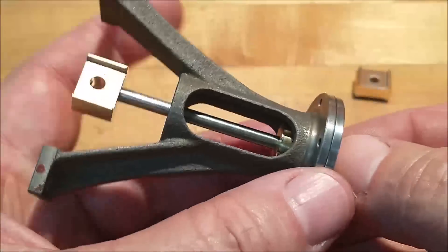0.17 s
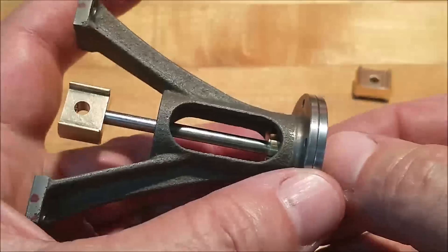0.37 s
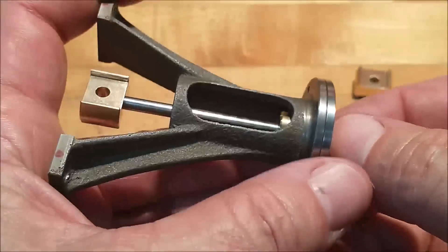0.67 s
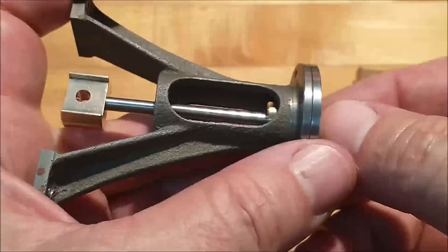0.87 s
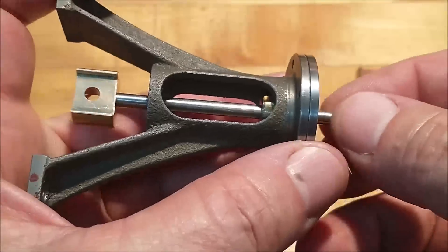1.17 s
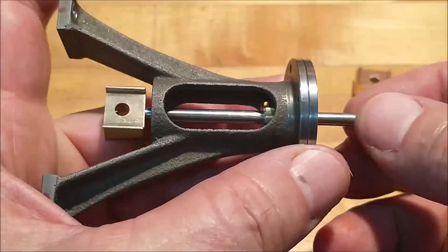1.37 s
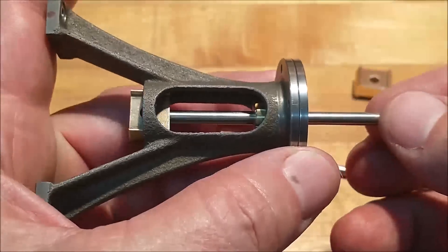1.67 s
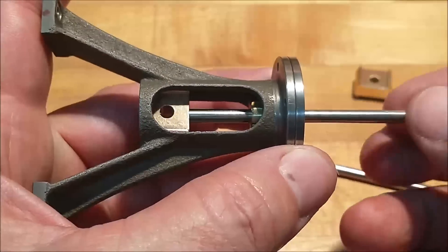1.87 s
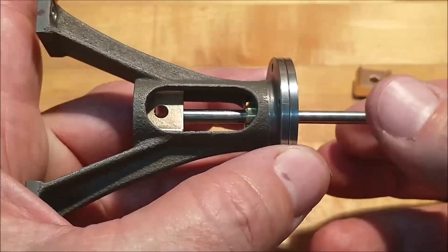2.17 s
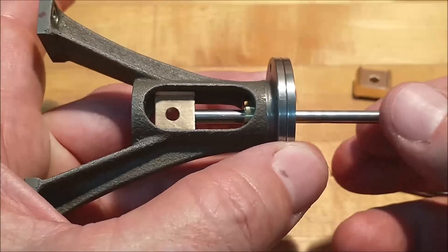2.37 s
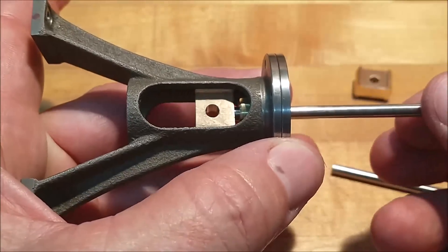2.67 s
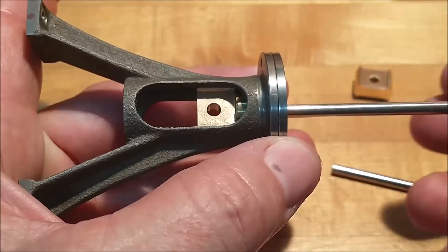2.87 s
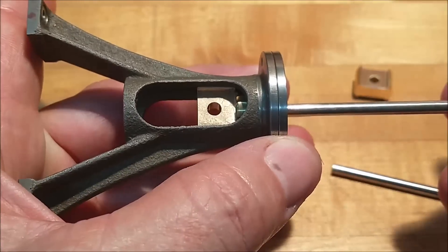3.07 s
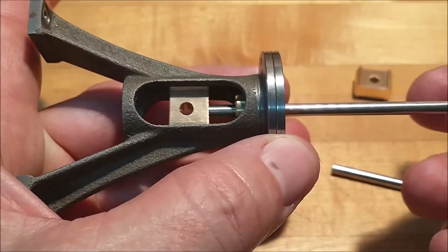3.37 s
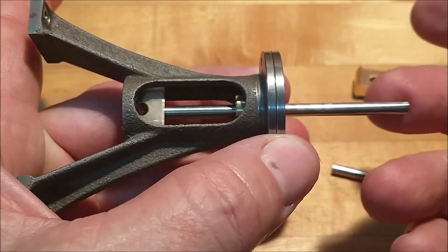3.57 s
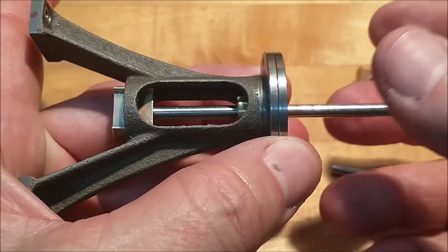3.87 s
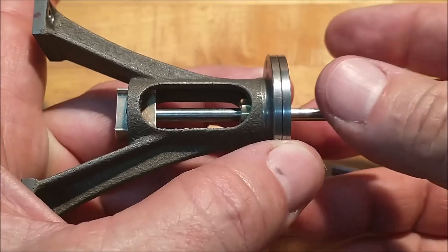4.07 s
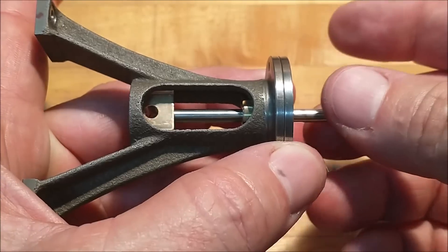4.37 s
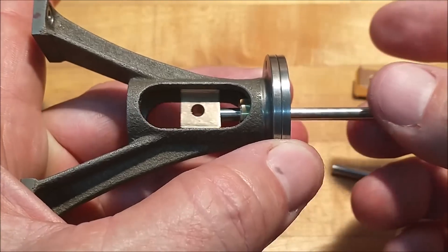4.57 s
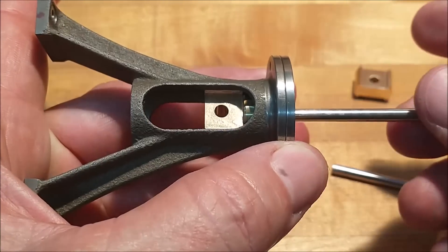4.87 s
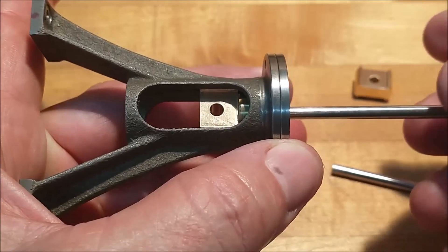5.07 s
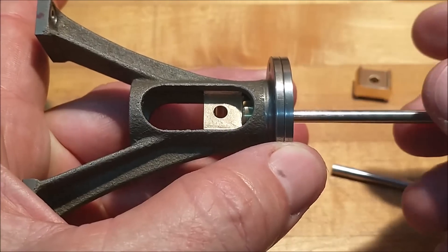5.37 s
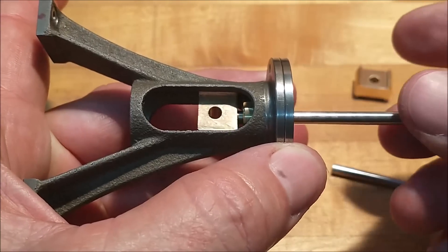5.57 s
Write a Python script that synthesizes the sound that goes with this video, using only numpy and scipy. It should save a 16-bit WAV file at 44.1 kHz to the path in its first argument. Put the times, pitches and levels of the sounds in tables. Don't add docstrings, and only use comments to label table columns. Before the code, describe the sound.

Steady machine noise fills an indoor workshop from beginning to end: a dominant low hum, quick even pulsing that blurs into a buzzing drone, light valve clacking, ringing metal rattle and quiet breathy hiss. Nothing starts or stops. The two microphones hear a wide, slightly uneven stereo picture, with solid lows and diffuse highs. The small metal rod and block being slid by hand make no distinct sound.

```python
import sys
import numpy as np
from scipy import signal
from scipy.fft import rfft, irfft, next_fast_len
from scipy.io import wavfile
from scipy.ndimage import uniform_filter1d, map_coordinates

SR = 44100
rng = np.random.default_rng(int(sys.argv[2]) if len(sys.argv) > 2 else 0)


def put_to_file(sound):
    columns = np.atleast_2d(sound).T
    safe = np.clip(columns, -1, 1)
    whole_steps = np.round(safe * 32767)
    wavfile.write(sys.argv[1], SR, whole_steps.astype(np.int16))


def linear_from_db(decibels):
    return 10 ** (np.asarray(decibels, float) / 20)


N = 251943

CRANK_HZ = 16.257
HUM_HZ = 120.01
LAG_S = 14 / SR

# multiple of the crank rate, level in dB rms, left-right difference in dB.
STRONG_HARMONICS = [(4, -53, -3), (5, -59, -2), (6, -54, -1), (7, -61, 0), (8, -45, -2), (9, -54, -1),
                    (10, -52, -3), (11, -56, 2), (12, -56, 1), (14, -55, -10), (16, -55, 0), (17, -62, -1),
                    (18, -49, -2), (19, -59, 0), (20, -54, -2), (21, -62, 2), (22, -55, -4), (23, -64, 0),
                    (25, -55, -6), (30, -62, -4), (34, -64, 3), (35, -63, 2), (32, -66, -10), (36, -61, -1),
                    (37, -59, -14), (38, -66, 2), (39, -66, 1), (42, -66, 0), (44, -64, 1), (46, -63, 0)]
# frequency in Hz, level in dB rms.
FAINT_HARMONICS = [(220, -69.5), (410, -65), (470, -75.5), (560, -72), (700, -76.5), (830, -67.5),
                   (1070, -81), (1230, -72.5)]
# frequency in Hz, arrival in turns.
BAND_ARRIVAL = [(90, 0.852), (115, .47), (146, .45), (180, 0.719), (235, 0.496), (280, 1.2), (310, .93),
                (480, 1.55)]
# frequency in Hz, left lead in radians.
STANDING_WAVE_LEAD = [(520, 0), (660, -1.0), (720, -2.34), (750, -3), (775, -0.4), (900, -0.7), (950, 0)]
# multiple of the hum, multiple of the crank rate, level in dB rms,
# left-right difference in dB, left lead in radians.
HUM_SIDEBANDS = [(1, 0, -39, 0, -0.2), (1, -3, -67, 0, 0.0), (1, -2, -58, -1, -0.3), (1, 1, -66, 0, -0.0),
                 (1, 3, -65, -3, -0.1), (1, 4, -67, 0, 0.3), (1, 5, -70, -2, 0.5), (1, 8, -75, -2, 0.2),
                 (-1, 14, -61, 0, -0.2), (2, -7, -66, 1, 0.0), (2, -4, -71, -1, 0.3), (3, 0, -66, -6, -0.1),
                 (4, 0, -81, -3, 0.3)]
# frequency in Hz, level in dB rms.
CLACK_LEVELS = [(1400, -85.5), (1650, -77), (2000, -84.5), (2200, -71.5), (2600, -74), (2900, -75),
                (3300, -84), (3800, -87), (4200, -99)]
# frequency in Hz, density in dB per Hz.
RUMBLE_SPECTRUM = [(42, 5), (65, 14), (122, 21), (150, 16), (230, 11), (400, 11), (460, 7), (700, 3),
                   (830, 9), (960, 3), (1400, 3), (1700, 6), (2100, 5), (2600, -30)]
# frequency in Hz, density in dB per Hz.
CASING_SPECTRUM = [(1700, -32), (2050, -8), (2350, 10), (2750, 14.5), (3150, 8.5), (3650, 12.5), (4000, 10),
                   (4500, 6.5), (4900, 2), (5600, -28)]
# frequency in Hz, density in dB per Hz.
HISS_SPECTRUM = [(4000, -13), (5000, 4.5), (6000, 10.5), (8000, 14.5), (9200, 10), (10500, 5), (11600, 2.5),
                 (12000, 5), (14000, 4.5), (15000, -5), (15200, -7), (15700, 0), (15900, -50)]
# frequency in Hz, width in Hz, level in dB.
TANK_MODES = [(410, 7, 27), (745, 12, 12), (810, 6, 14), (829, 8, 18), (861, 7, 14), (911, 6, 13),
              (1000, 16, 10), (1253, 14, 10), (1322, 16, 8), (1403, 8, 10), (1462, 7, 10), (1623, 12, 11),
              (1670, 20, 11), (1837, 7, 23), (1859, 5, 21), (1964, 8, 12)]
# frequency in Hz, width in Hz, level in dB.
SHELL_MODES = [(2104, 6, 13), (2195, 7, 13), (2227, 9, 15), (2309, 8, 19), (2343, 8, 16), (2465, 14, 18),
               (2735, 25, 21), (2932, 14, 18), (3083, 9, 17), (3179, 9, 20), (3287, 12, 20), (3400, 14, 18),
               (3505, 10, 25), (3630, 10, 19), (3670, 14, 26), (3753, 10, 22), (3987, 8, 15),
               (4044, 14, 15), (4125, 10, 14), (4284, 10, 14), (4400, 8, 14)]
# frequency in Hz, width in Hz, level in dB.
PORT_WHISTLES = [(5084, 26, 15.5), (5980, 40, 16), (6370, 61, 18.5), (9030, 114, 15.5)]
# time in seconds, level in dB.
RATTLE_LEVELS = [
    (0.0, -47),
    (0.75, -46),
    (2.22, -49.5),
    (2.34, -47.5),
    (2.85, -48),
    (3.96, -47),
    (4.02, -49),
    (5.37, -48.5),
    (5.71, -48),
]
# frequency in Hz, left-right coherence from 0 to 1.
LIKENESS = [(60, 0.91), (250, 1), (500, 0.75), (1000, 0.21), (2500, 0.29), (5000, 0.22), (15000, 0.15)]
# frequency in Hz, left-right difference in dB.
SIDE_BALANCE = [(60, 4), (110, 3), (200, -3), (380, -2), (700, -3), (1290, -1), (2380, -3), (4400, -0.5),
                (8120, -7), (15000, -6)]


def unit(x):
    return x / np.sqrt(np.mean(x ** 2) + 1e-20)


def along(points, hz):
    point_hz, value = np.transpose(points)
    return np.interp(np.log(hz + 1), np.log(point_hz + 1), value)


def wobble(rate, count=N, per=SR):
    knots = rng.standard_normal(int(count * rate / per) + 4)
    return map_coordinates(knots, [np.arange(count) * rate / per])


def throb(depths, start):
    angle = 2 * np.pi * (CRANK_HZ * np.arange(N) / SR - start)
    return 1 + sum(d * np.cos(2 ** (k + 1) * angle) for k, d in enumerate(depths))


def resonant_noise(spectrum, modes, ripple_db, ripple_hz, patchy_db):
    z = signal.stft(rng.standard_normal((2, N)), nperseg=1024)[2]
    field = uniform_filter1d(rng.standard_normal(z.shape[1:]), size=6, axis=0)
    field = uniform_filter1d(field, size=24, axis=1)
    pair = signal.istft(z * linear_from_db(patchy_db * unit(field)), nperseg=1024)[1][:, :N]

    m = next_fast_len(N + SR // 2)
    f = np.fft.rfftfreq(m, 1 / SR)
    ripple = ripple_db * np.array([wobble(1 / ripple_hz, count=len(f), per=m / SR) for _ in range(2)])
    peaks = sum(linear_from_db(db) ** 2 / (1 + (2 * (f - hz) / width) ** 2) ** 2 for hz, width, db in modes)
    gain = np.sqrt(linear_from_db(along(spectrum, f) + ripple) ** 2 + peaks)

    turn = np.arccos(np.clip(along(LIKENESS, f), 0, 1)) / 2
    mid, side = rfft(pair, m) * [np.cos(turn), np.sin(turn)]
    pan_db = along(SIDE_BALANCE, f) / 2
    lag = np.exp(-1j * np.pi * f * LAG_S)
    both = [(mid + side) * lag, (mid - side) / lag]
    return irfft(gain * linear_from_db([pan_db, -pan_db]) * both, m)[:, :N]


def at_points(hz, db, pan_db, lead, phase):
    turn = np.pi * hz * LAG_S - lead / 2
    share = 2 / np.sqrt(1 + linear_from_db(-2 * np.array([pan_db, -pan_db])))
    return linear_from_db(db) * share * np.exp(1j * (phase + [-turn, turn]))


def every_turn(order, sizes):
    size = 2 ** 15
    bins = np.zeros((2, size // 2 + 1), complex)
    bins[:, order.astype(int)] = sizes * size / 2
    place = CRANK_HZ * np.arange(N) / SR % 1 * size
    return np.array([np.interp(place, np.arange(size), v, period=size) for v in irfft(bins, size)])


def tank():
    rumble = resonant_noise(RUMBLE_SPECTRUM, TANK_MODES, ripple_db=3.0, ripple_hz=12, patchy_db=1.5)
    return linear_from_db(-49.8) * throb([.08, .08], start=0.25) * rumble


def air():
    swell = linear_from_db(0.14 * wobble(2.84) + 0.25 * wobble(0.98))
    hiss = resonant_noise(HISS_SPECTRUM, PORT_WHISTLES, ripple_db=2.0, ripple_hz=22.08, patchy_db=0.82)
    return linear_from_db(-50.0) * swell * throb([.05, .035, .03], start=0.37) * hiss


def casing():
    s, db = np.transpose(RATTLE_LEVELS)
    looseness = linear_from_db(np.interp(np.arange(N) / SR, s, db - np.mean(db)))
    fin_swell = linear_from_db(0.5 * wobble(3))
    rattle = resonant_noise(CASING_SPECTRUM, SHELL_MODES, ripple_db=4.0, ripple_hz=14, patchy_db=1.07)
    upper = signal.sosfiltfilt(signal.butter(4, 3150, "high", fs=SR, output="sos"), rattle)
    lower = rattle - upper
    return linear_from_db(-49.5) * throb([.05, .08, .05], start=0.18) * looseness * (lower + fin_swell * upper)


def valve_clack():
    order = np.arange(87, 260)
    hz = order * CRANK_HZ
    luck = rng.standard_normal((len(hz), 4))
    db = along(CLACK_LEVELS, hz) - 2.5 + 5 * luck[:, 0]
    pan_db = -2.5 + 6 * luck[:, 1]
    sizes = at_points(hz, db, pan_db, lead=1.23 * luck[:, 2], phase=9 * luck[:, 3])
    return linear_from_db(2.0 * wobble(2.08)) * every_turn(order, sizes)


def crank_harmonics():
    order = np.arange(4, 87)
    hz = order * CRANK_HZ
    luck = rng.standard_normal((len(hz), 3))
    twin_db = 1.5 * (-1.0) ** order
    db = along(FAINT_HARMONICS, hz) + twin_db + 2.5 * luck[:, 0]
    pan_db = -1.5 + 6 * luck[:, 1]
    lead = 1.55 * np.clip(hz / 1020, 0, 1) ** 2 * luck[:, 2]
    lead += along(STANDING_WAVE_LEAD, hz)
    strong, strong_db, strong_pan_db = np.transpose(STRONG_HARMONICS)
    place = np.searchsorted(order, strong)
    db[place], pan_db[place] = strong_db, strong_pan_db
    return order, db, pan_db, lead


def motor_hum(start_phase):
    mains, shaft, db, pan_db, lead = np.transpose(HUM_SIDEBANDS)
    hz = mains * HUM_HZ + shaft * CRANK_HZ
    drift = rng.uniform(0, 2 * np.pi, len(db)) * (np.arange(len(db)) > 0)
    sizes = at_points(hz, db, pan_db, lead, start_phase + drift)
    hum = np.real(sizes @ np.exp(2j * np.pi * np.outer(hz, np.arange(N) / SR)))
    return hum * linear_from_db(.3 * wobble(2))


def pump_and_motor():
    order, db, pan_db, lead = crank_harmonics()
    hz = order * CRANK_HZ
    spread = np.clip(hz / 1800, 0, .4) + np.clip(hz / 850, 0, 2) ** 8
    scatter = spread * rng.standard_normal(len(hz))
    phase = np.pi + scatter - 2 * np.pi * np.cumsum(along(BAND_ARRIVAL, hz))
    crank = every_turn(order, at_points(hz, db, pan_db, lead, phase))
    return crank * linear_from_db(.25 * wobble(3)) + motor_hum(phase[order == 8] - .23)


def scene():
    return tank() + air() + casing() + valve_clack() + pump_and_motor()


def band_limit(x):
    return signal.sosfilt(signal.butter(12, 15730, fs=SR, output="sos"), x)


def record(dry):
    return band_limit(dry)


dry = scene()
out = record(dry)
put_to_file(out)
```